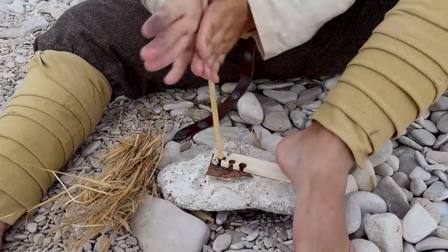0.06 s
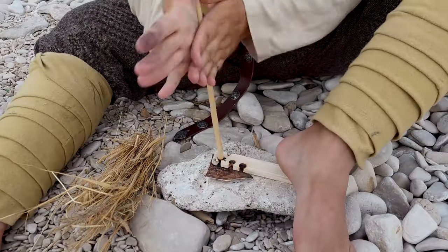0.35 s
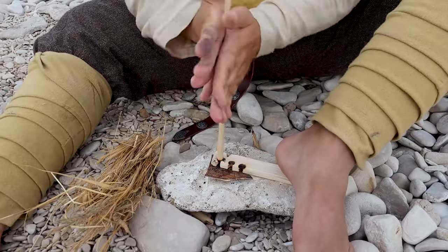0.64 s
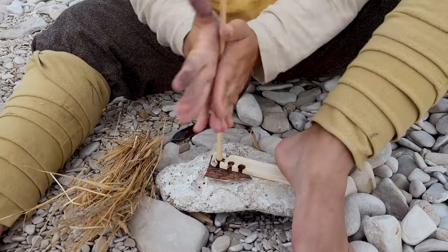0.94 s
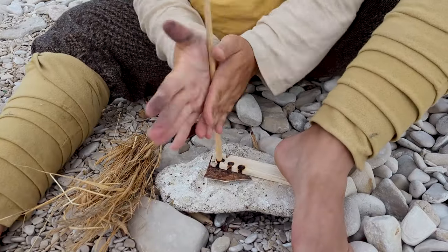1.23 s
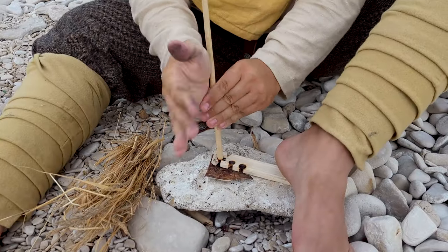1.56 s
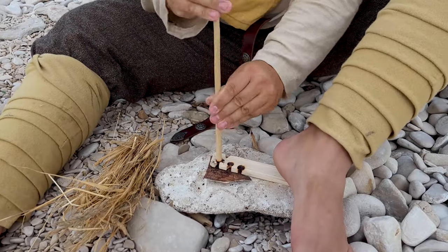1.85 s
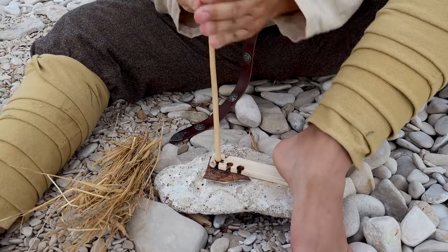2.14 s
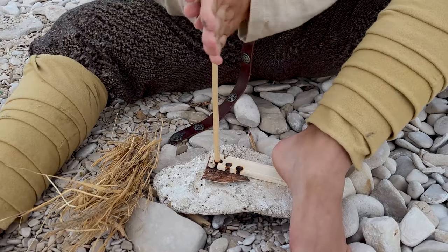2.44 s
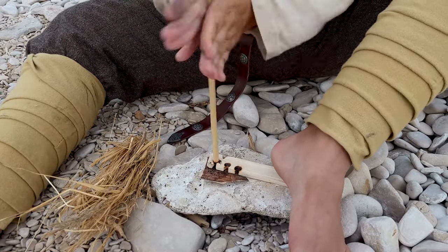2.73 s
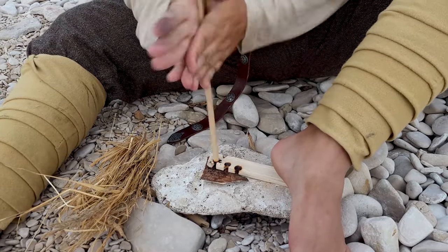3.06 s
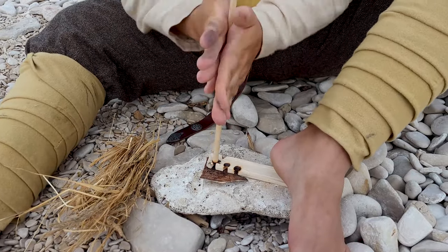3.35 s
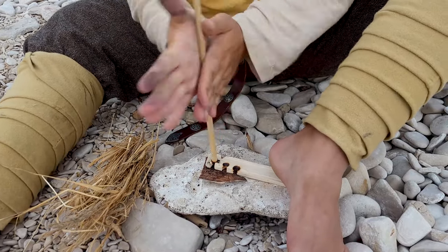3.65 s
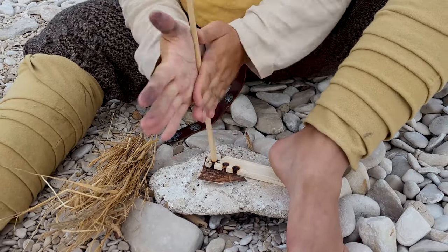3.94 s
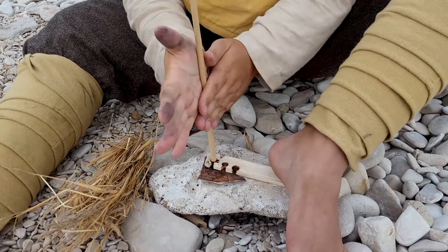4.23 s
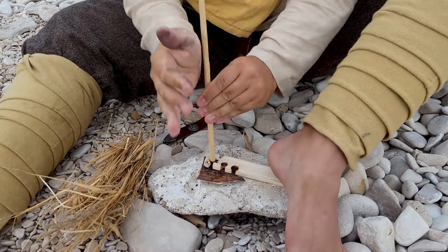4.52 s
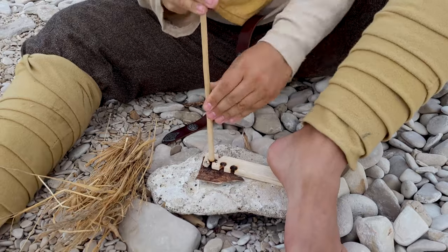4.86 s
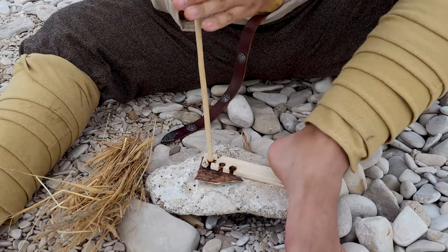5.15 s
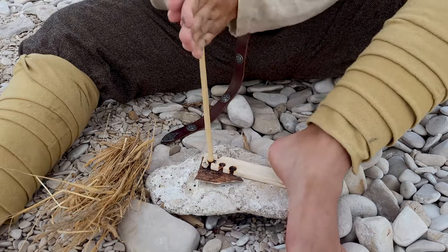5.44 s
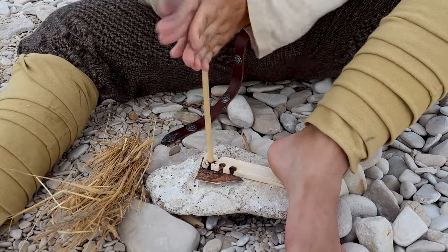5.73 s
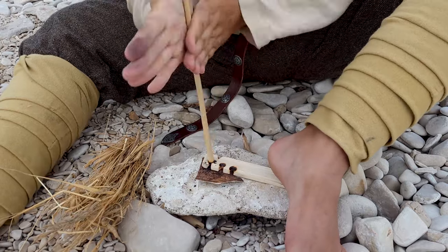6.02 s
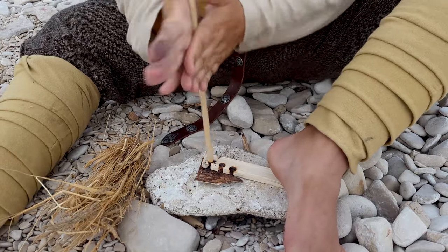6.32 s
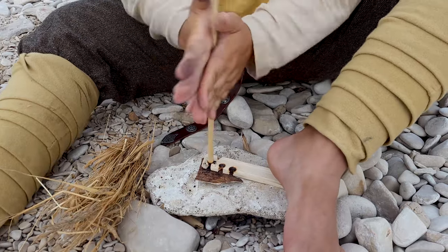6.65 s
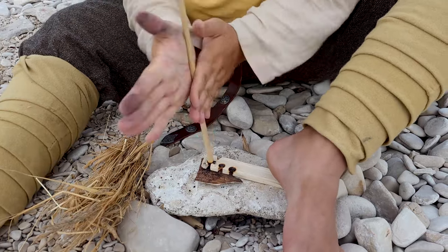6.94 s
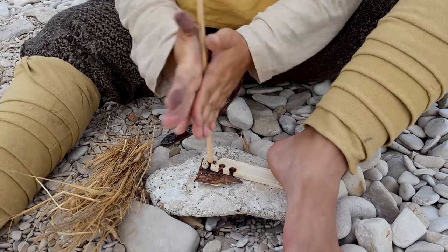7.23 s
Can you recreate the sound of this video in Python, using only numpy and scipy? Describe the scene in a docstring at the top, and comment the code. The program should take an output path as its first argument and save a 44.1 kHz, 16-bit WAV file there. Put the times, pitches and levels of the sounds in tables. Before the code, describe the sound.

A wooden spindle spun between the palms chirps shrilly and squeals against a fireboard, with a few knocks over faint surf.

```python
"""Shrill, paired chirps of a hand drill: a wooden spindle rolled between the palms in a charred socket.
At every reversal the tip sticks and slips, once braking and once restarting. Turned slowly while the
hands climb back up, it squeals and creaks. Brief squeaks, whistles and a few knocks on the fireboard
break in, over crackling char, a low grind and surf on a pebble beach.
Two microphone ports a hand apart hear it all from the left."""
import sys
import numpy as np
from scipy import signal
from scipy.fft import rfft, irfft, next_fast_len
from scipy.io import wavfile
from scipy.ndimage import uniform_filter1d, map_coordinates

SR = 44100
rng = np.random.default_rng(int(sys.argv[2]) if len(sys.argv) > 2 else 0)


def log_audio(samples):
    """Write samples as a 16-bit WAV file to the path given in sys.argv[1]."""
    # one column per channel
    frames = np.atleast_2d(samples).T
    # limit to full scale, then quantise
    limited = np.clip(frames, -1, 1)
    pcm = np.round(limited * 32767).astype(np.int16)
    wavfile.write(sys.argv[1], SR, pcm)


N = 325458

# The spindle's bright, broad tone colour. Each row: frequency in Hz, level in dB.
SPINDLE_SPECTRUM = [(2000, -43), (5500, -9), (6800, -6.5), (8000, -6), (9000, -1.5), (10300, -3),
                    (11200, -3), (12300, 2.5), (13500, 0.5), (15300, 12), (16500, -7.5)]
# Long squeals, one list each. Each row: time in seconds, pitch in Hz, relative levels of the high
# and of the low overtones in dB.
SQUEAL_PHRASES = [
    [(1.165, 1667, -37, -31.5), (1.187, 1674, -31.5, -44), (1.209, 1837, -33, -30),
     (1.255, 1835, -27, -29.5), (1.277, 1814, -38, -49), (1.329, 1817, -30, -40), (1.365, 1665, -37.5, -57),
     (1.377, 1533, -37, -42), (1.405, 1771, -34, -52), (1.455, 1825, -44, -40), (1.48, 1810, -62, -63)],
    [(1.62, 1899, -65, -67), (1.632, 1869, -46.5, -65), (1.648, 1831, -42.5, -52),
     (1.688, 1913, -42.5, -43.5), (1.698, 1765, -43, -54), (1.752, 1868, -40.5, -54.5),
     (1.834, 1664, -41.5, -55), (1.854, 1367, -39.5, -54), (1.908, 1605, -37.5, -46),
     (1.94, 1564, -41, -57), (1.95, 1541, -70, -76)],
    [(4.103, 1555, -54, -53), (4.107, 1566, -33, -40), (4.139, 1770, -32.5, -55), (4.169, 1832, -35, -32.5),
     (4.181, 1853, -33, -41), (4.283, 1804, -36.5, -54), (4.315, 1735, -39, -70), (4.341, 1767, -33.5, -43),
     (4.375, 1822, -45.5, -44.5), (4.439, 1774, -50, -62), (4.465, 1750, -74, -77)],
    [(4.53, 1710, -65, -64), (4.534, 1748, -53, -69), (4.542, 1910, -49.5, -92), (4.576, 1790, -43, -46),
     (4.584, 1833, -41, -52), (4.662, 1820, -40.5, -54), (4.714, 1747, -41, -51), (4.732, 1756, -41, -52),
     (4.74, 1680, -51, -66), (4.75, 1723, -78, -75)],
]
# Fader moves of the two beds. Each row: time in seconds, relative surf and grinding levels in dB.
BED_LEVELS = [(0.0, -51, -54), (0.2, -51, -52.5), (1.01, -58.5, -61), (1.35, -57.5, -61.5),
              (1.44, -56, -64.5), (1.99, -52.5, -57.5), (2.49, -47.5, -49), (3.35, -54.5, -55),
              (3.82, -54.5, -58), (4.36, -55, -60.5), (5.08, -54.5, -57), (5.41, -47.5, -49.5),
              (5.92, -47.5, -51), (6.27, -49, -48.5), (6.86, -54, -57.5), (7.38, -50, -61)]


def chirps(ring_hz=11320, bite_s=.003, skirt_db=-23, lead_s=.0011, tail_s=.026):
    """The tip bites and rasps; its pitch slides onto a spindle mode, holds there and slides off."""
    # Tone colour of the low rasp. Each row: frequency in Hz, level in dB.
    rasp_spectrum = [(900, -19), (1600, 5), (2400, 3), (3300, 3.5), (4200, -3), (5300, 8.5), (6300, -17.5),
                     (8000, -47)]
    t = np.arange(N) / SR
    high_gain, low_gain, ring_gain = np.zeros((3, N))
    pitch = np.full(N, float(ring_hz))
    for start, length, db, low_db, ring_share, glide in chirp_train():
        hz = ring_hz * (1 + .0087 * rng.standard_normal())
        near = slice(max(int((start - .05) * SR), 0), int((start + length + .19) * SR))
        age = t[near] - start
        progress = 2 * age / max(length, .002) - 1  # -1 at the start, 1 at the end
        grip = np.clip(age / bite_s + .5, 0, 1) * np.clip(1.15 - progress, 0, 1)
        fade = np.minimum(age / lead_s, 0) + np.minimum((length - age) / tail_s, 0)
        skirt = amp(skirt_db) * np.exp(fade)  # lighter rubbing before and after
        high_gain[near] += amp(db) * (grip * np.sqrt(1 - ring_share) + skirt)
        low_gain[near] += amp(db + low_db) * (grip + skirt)
        ring_gain[near] += amp(db) * grip * np.sqrt(ring_share)
        pitch[near] = np.where(grip > 0, hz * (1 + glide * np.clip(progress, -1, 1) ** 3), pitch[near])
    rasp = palm_damping(spread(slips(1900, scatter=.45, size_db=4, ring_s=.0013)), depth_db=6.5)
    phase = phase_of(pitch * (1 + .028 * wobble(1500)))
    sway = .7 * stereo_wobble(100)  # the swaying spindle changes its path to each port
    ring = unit(np.sin(phase + sway) * amp(.32 * wobble(400)))
    # half-regular slips give the rasp a woody pitch
    slip_phase = phase_of(1700 * (1 + .03 * wobble(120) + .075 * wobble(1500)))
    groan = unit(np.sin(2 * slip_phase) + np.sin(3 * slip_phase))
    woody = np.sqrt(.6) * wooden(rasp, rasp_spectrum) + np.sqrt(.4) * groan
    return high_gain * wooden(rasp, SPINDLE_SPECTRUM) + amp(-2.5) * low_gain * woody + ring_gain * ring


def chirp_train(pause_s=.013, light_db=-41, pressed_db=-10.5, brake_glide=-.15, rise_glide=.0567):
    """Cue the chirps: hand pressure shortens the standstill and coarsens the restart."""
    # The palms reverse. Each row: restart in seconds, pressure 0-1, braking length in seconds and
    # level in dB, restart length in seconds and level in dB, ringing share of the restart 0-1.
    reversals = [(0.038, .7, 0.016, -24.5, 0.013, -23.5, 0), (0.156, 0.34, 0.021, -24.5, 0.01, -19, 0.5),
                 (0.26, 0.75, 0.023, -23.5, 0.017, -24, 0), (.385, 0.17, 0.0094, -25.5, .012, -26, 0.77),
                 (0.493, 0.4, 0.015, -23.5, 0.019, -20, 0.82), (.614, 0.08, .005, -31, 0.01, -23.5, 0.71),
                 (0.719, 0.71, 0.024, -24, 0.026, -21, .45), (0.926, 0.85, .01, -24, 0.05, -24.5, 0.03),
                 (1.175, 0.66, 0.02, -26.5, .018, -30, .1), (2.601, 0, .012, -25.5, .01, -13, 0.72),
                 (2.713, 0.64, .023, -25, .032, -22, .65), (2.847, 0.18, 0.012, -25, .015, -17.5, 0.88),
                 (2.952, 0.74, 0.02, -23, 0.018, -23.5, 0.06), (3.075, 0, 0.0065, -23, 0.021, -23.5, 0.02),
                 (3.184, 0.45, 0.0093, -18.5, 0.013, -20.5, 0.24),
                 (3.402, 0.94, 0.0208, -22, 0.025, -24, 0.26), (3.622, 0.86, 0.016, -23, 0.031, -22, .3),
                 (3.848, 0.9, 0.019, -23, 0.043, -26.5, 0.3),
                 (5.606, 0.08, 0.0111, -27, 0.0175, -19.5, 0.68),
                 (5.724, 0.68, .026, -21.5, 0.022, -16, 0.83), (5.85, 0.03, 0.0094, -22, .016, -15.5, 0.91),
                 (5.957, 0.51, 0.014, -18.5, 0.02, -22.5, .2), (6.193, 0.82, .014, -18, .026, -25.5, 0.53),
                 (6.431, .85, 0.0094, -15, 0.022, -21.5, 0), (6.662, 0.63, 0.011, -18.5, 0.014, -22.5, .2),
                 (6.896, 0.57, .011, -21, .018, -19, 0.15), (7.121, 0.77, 0.012, -22, 0.019, -22, .4)]
    # The tip catches for an instant between chirps. Each row: start in seconds, level in dB.
    catches = [(0.223, -32), (.334, -35.5), (0.571, -39), (.839, -42), (1.052, -39), (1.072, -33.5),
               (2.671, -28), (2.813, -34), (3.149, -31), (3.288, -24.5), (3.509, -30.5), (3.733, -36.5),
               (6.066, -29), (6.089, -34), (6.158, -32), (6.222, -27), (6.309, -35.5), (6.553, -42),
               (7.092, -29), (7.326, -40)]
    # Each cue: start and length in seconds, level and relative low rasp in dB, ringing share,
    # glide as a share of the pitch.
    train = [(start, .00498, db, light_db, .08, rise_glide) for start, db in catches]
    for restart, pressure, brake_s, brake_db, restart_s, restart_db, ring_share in reversals:
        brake_at = restart - pause_s * (1 - .93 * pressure) - brake_s
        rasp_db = light_db + pressure * (pressed_db - light_db)
        train.append((brake_at, brake_s, brake_db, -24.5, .17, brake_glide))
        train.append((restart, restart_s, restart_db, rasp_db, ring_share, rise_glide))
    return train


def squeals():
    """Turned slowly, the tip slips steadily: a stack of overtones that frays when the grip is uneven."""
    # Tone colours of the squeal's high and low voices. Each row: frequency in Hz, level in dB.
    high_spectrum = [(5500, -13), (6600, -1.5), (7300, 4.5), (9100, -2), (10900, 8.5), (12700, -3.5),
                     (14600, 6), (16500, 1.5)]
    low_spectrum = [(1000, -10), (1750, -5), (3650, -0.5), (5450, 7.5), (6000, 5), (7000, -11)]
    gate, course_hz, high_db, low_db = phrases(SQUEAL_PHRASES)
    glide_hz = uniform_filter1d(course_hz, size=900)
    rough = roughness(glide_hz)
    waver = 1 + .003 * wobble(60) + .011 * rough * wobble(150) + (.003 + .013 * rough) * wobble(1600)
    pitch = glide_hz * waver
    phase = phase_of(pitch)
    stack = np.zeros((2, N))
    for k in range(1, 10):
        favour_db = 2.2 * wobble(22) + 1.5 * stereo_wobble(15)  # turning favours changing overtones
        flutter_db = (1 + 3.5 * rough) * wobble(300)
        drift = .55 * stereo_wobble(12) * min(k / 4, 1)
        stack += amp(favour_db + flutter_db) * np.sin(k * phase + drift)
    scrape = palm_damping(spread(slips(pitch, scatter=.38, size_db=5.5, ring_s=.00025)), depth_db=9)

    def voice(spectrum, fray):
        return np.sqrt(1 - fray) * coloured(stack, spectrum) + np.sqrt(fray) * coloured(scrape, spectrum)

    high = amp(high_db + 6) * voice(high_spectrum, rough ** 1.5)
    low = amp(low_db + 1.5) * voice(low_spectrum, rough ** 2)
    return gate * (high + low)


def roughness(pitch, clean_hz=1820, break_sag_hz=350):
    """A squeal bites roughly and settles; it frays again whenever its pitch sags."""
    # The grip in each squeal. Each row: settling time in seconds, roughness that stays 0-1.
    grips = [(.04, .18), (.12, .24), (.055, .08), (.06, .05)]
    settling = []
    for rows, (settle_s, rest) in zip(SQUEAL_PHRASES, grips):
        start, end = rows[0][0], rows[-1][0]
        settling += [(start, .85), (start + settle_s, rest), (end, rest)]
    sag = np.maximum(clean_hz - pitch, 0) / break_sag_hz
    return np.clip(curves(settling)[0] + sag ** 2, 0, 1)


def creaks():
    """As the palms take a new hold, the slips slow down into a grainy creak."""
    # One list per creak. Each row: time in seconds, relative levels of bright edge and body in dB.
    creak_phrases = [
        [(1.96, -79, -79), (1.98, -45, -70), (2.002, -63, -76), (2.01, -44.5, -56), (2.046, -42, -54),
         (2.076, -75, -75), (2.104, -46, -54), (2.27, -60, -52)],
        [(2.275, -47, -55), (2.317, -25, -48), (2.329, -31, -51), (2.343, -27.5, -41), (2.421, -35.5, -54),
         (2.429, -34, -34), (2.459, -29.5, -43), (2.485, -43, -44)],
        [(4.88, -77, -79), (4.894, -76, -79), (4.898, -63, -68), (4.904, -56, -64), (4.986, -53.5, -62),
         (5.002, -58, -62), (5.01, -76, -78), (5.02, -77, -79)],
        [(5.22, -77, -66), (5.236, -62, -41.5), (5.302, -82, -74), (5.346, -38.5, -42.5), (5.394, -46, -60),
         (5.424, -28.5, -34), (5.454, -32.5, -35), (5.5, -60, -63)],
    ]
    # Pace of the slips, which nearly stall once. Each row: time in seconds, slips per second.
    slip_rates = [(2.04, 550), (2.1, 390), (2.355, 510), (2.42, 140), (2.45, 900), (4.89, 640)]
    # The creak's woody body. Each row: frequency in Hz, level in dB.
    body_spectrum = [(1200, -22), (2200, -0.5), (2800, 2), (3500, -0.5), (4400, -7.5), (5300, -7.5),
                     (7500, -5)]
    gate, edge_db, body_db = phrases(creak_phrases)
    rate = curves(slip_rates)[0] * np.exp(.12 * wobble(25))
    ticks = spread(slips(rate, scatter=.12, size_db=2, ring_s=.0007))
    ticks *= np.sqrt(np.mean(rate) / rate)  # sparser slips hit harder
    ticks = palm_damping(ticks, depth_db=2.5)
    edge = amp(edge_db + 4) * wooden(ticks, SPINDLE_SPECTRUM)
    body = amp(body_db - 2) * wooden(ticks, body_spectrum)
    return gate * (edge + body)


def squeaks(rise=.0344, third_db=5):
    """A hard-pressed stroke ends in a brief squeak that bends upward."""
    # Each row: start and length in seconds, level in dB, centre pitch in Hz, relative overtones in dB.
    cues = [(.038, .02, -35, 980, -22), (.26, 0.0086, -35.5, 1046, -11), (.716, 0.0076, -42, 1448, 12.5),
            (0.936, 0.04, -44, 1710, -21), (1.905, 0.033, -44.5, 307.8, -8), (2.951, 0.015, -36, 1106, -30),
            (3.182, .0074, -33.5, 3580, -9), (3.624, 0.028, -41, 1630, -12),
            (3.845, 0.0464, -32.5, 1805, -1.5), (4.802, 0.0098, -55.5, 3190, 11),
            (4.842, 0.021, -62.5, 3340, 19.5), (5.957, .012, -32.5, 993, -14),
            (6.659, 0.013, -40.5, 1494, 9), (6.89, .029, -35, 1662, 3.5), (7.118, 0.0323, -36.5, 1830, -1)]
    out, waver = np.zeros(N), 1 + .022 * wobble(1200)
    for start, length, db, hz, overtone_db in cues:
        start_hz, end_hz = hz * (1 - rise), hz * (1 + rise)
        n, at = int(length * SR), int(start * SR)
        phase = phase_of(np.linspace(start_hz, end_hz, n) * waver[at:at + n])
        overtones = sum(amp(third_db * (k == 3)) * np.sin(k * phase)
                        for k in range(2, 6) if k * end_hz < SR / 2)
        tone = unit(np.sin(phase)) + amp(overtone_db) * unit(overtones)
        out[at:at + n] += amp(db) * signal.windows.tukey(n, .5) * tone
    return out


def whistles(left_lead_db=6):
    """One spindle mode takes over the friction and sings with its octave."""
    # Each row: start and length in seconds, level in dB, first and last pitch in Hz,
    # octave against the fundamental in dB.
    cues = [(2.316, .03, -23.5, 7220, 7220, -6), (2.578, 0.01, -25.5, 6880, 6360, -15),
            (5.363, .022, -29.5, 7040, 7360, -7), (5.385, 0.049, -22.5, 7220, 7380, 0.5),
            (5.584, 0.01, -24, 4650, 4450, -13.5)]
    out, waver = np.zeros(N), 1 + .0055 * wobble(1200)
    for start, length, db, start_hz, end_hz, octave_db in cues:
        n, at = int(length * SR), int(start * SR)
        phase = phase_of(np.linspace(start_hz, end_hz, n) * waver[at:at + n])
        tone = unit(np.sin(phase) + amp(octave_db) * np.sin(2 * phase))
        out[at:at + n] += amp(db) * signal.windows.tukey(n, .5) * tone
    return out * amp(left_lead_db * np.array([[.5], [-.5]]))


def knocks():
    """The spindle knocks in its socket: dull blows on a board that foot and stone damp at once."""
    # Each row: start in seconds, level in dB.
    blows = [(0.9224, -15.5), (1.1532, -17), (1.722, -26.5), (4.0892, -22), (7.3191, -18.5)]
    # Fireboard modes. Each row: frequency in Hz, level in dB, seconds to die away by 60 dB.
    board_modes = [(277, -16.5, 0.062), (608, -4, 0.025), (1070, 4.5, 0.0097), (1400, 1.5, 0.0057)]
    out, t = np.zeros(N + SR), np.arange(SR // 10) / SR
    for start, db in blows:
        ring = sum(amp(level + rng.normal(0, 1) - 60 * t / t60) * np.sin(2 * np.pi * hz * t) * (-1) ** k
                   for k, (hz, level, t60) in enumerate(board_modes))
        out[round(start * SR):][:len(t)] += amp(db) * ring / np.max(abs(ring))
    return out[:N]


def dust(level_db):
    """Fine crackle of char between the chirps."""
    # The char's hissy tone colour. Each row: frequency in Hz, level in dB.
    spectrum = [(2000, -58), (4000, 4), (7500, -2.5), (9000, 0), (11000, 9), (13000, 2), (15500, 9.5)]
    grains = palm_damping(spread(slips(2500, scatter=.5, size_db=3, ring_s=.0012)), depth_db=1.5)
    return amp(level_db + 3.9 * wobble(33)) * coloured(grains, spectrum)


def passes(idle_db=-60.5, fade_s=.086):
    """Dust level and friction treble, in dB, drift as the palms work their way down the spindle."""
    # Each row: start and end in seconds, first and last dust level in dB, first and last treble in dB.
    descents = [(0, 1.4, -43.5, -56, 2.5, 0), (2.32, 4.056, -40, -54.5, 0.5, 3),
                (5.35, 7.45, -47.5, -45, 1, -6)]
    rows = []
    for start, end, dust_from, dust_to, treble_from, treble_to in descents:
        rows += [(start - fade_s, idle_db, treble_from), (start, dust_from, treble_from),
                 (end, dust_to, treble_to), (end + fade_s, idle_db, treble_to)]
    return curves(rows)


def grinding():
    """The running spindle grinds in its socket: dense slips blur into a quiet bed."""
    # The grind's midrange colour. Each row: frequency in Hz, level in dB.
    spectrum = [(300, -23), (900, -6.5), (1400, 1), (2000, 2.5), (2600, -13), (4000, -15), (7000, -9),
                (16000, -30)]
    _, level_db = curves(BED_LEVELS)
    grains = palm_damping(spread(slips(2500, scatter=.34, size_db=0, ring_s=.0029)), depth_db=4)
    return amp(level_db + 1 + .58 * wobble(16)) * coloured(grains, spectrum)


def surf():
    """Surf washes behind the drill as dark, swelling noise."""
    # Tone colour of the wash. Each row: frequency in Hz, level in dB.
    spectrum = [(20, -20), (48, -4), (90, -3), (150, -1), (260, 5.5), (400, 1), (600, -0.5), (900, 0),
                (1400, -11), (3000, -11), (16000, -40)]
    level_db, _ = curves(BED_LEVELS)
    return amp(level_db + 3.5 + wobble(10)) * coloured(spread(rng.standard_normal((2, N))), spectrum)


def slips(rate, scatter, size_db, ring_s):
    """Uneven slips, about rate a second; each shakes the wood into a noise burst, in two channels."""
    count = np.floor(np.cumsum(rate * np.exp(scatter * wobble(700))) / SR)
    kicks = np.diff(count, prepend=0) * amp(size_db * rng.standard_normal(N))
    shake = signal.lfilter([1], [1, -np.exp(-1 / (ring_s * SR))], kicks)
    return shake * rng.standard_normal((2, N))


def wooden(x, spectrum):
    """Play x through a broad spectrum and the spindle's resonances, at rms 1."""
    # The spindle's peaks and notches. Each row: centre and width in Hz, boost or cut in dB.
    resonances = [(3650, 1600, 10.5), (4500, 440, 1), (5700, 110, 0), (7550, 1080, 8), (7570, 540, 5.5),
                  (9500, 380, 3.5), (8880, 120, -2), (10905, 425, 17), (11930, 320, -13), (17000, 360, -11)]
    peaks = lambda hz: 1 + sum((amp(db) - 1) / (1 + (2 * (hz - centre) / width) ** 2)
                               for centre, width, db in resonances)
    return unit(filtered(x, lambda hz: amp(along(spectrum, hz)) * peaks(hz)))


def palm_damping(x, depth_db):
    """The moving palms damp the wood in ever different narrow bands."""
    bands = signal.stft(x, nperseg=512)[2]
    field = uniform_filter1d(rng.standard_normal(bands.shape), size=3, axis=1)  # across frequency
    field = uniform_filter1d(field, size=4, axis=2)  # across time
    return unit(signal.istft(bands * amp(depth_db * unit(field)), nperseg=512)[1][:, :N])


def spread(pair):
    """Mix two unrelated signals to a partly alike left and right."""
    # Stereo image. Each row: frequency in Hz, left-right likeness 0-1.
    likeness = [(50, 0.74), (200, 0.98), (1000, 0.86), (2000, 0.93), (3000, 0.057), (16000, 0.82)]
    angle = lambda hz: np.arccos(np.clip(along(likeness, hz), -1, 1)) / 2
    mid, side = filtered(pair, lambda hz: np.array([np.cos(angle(hz)), np.sin(angle(hz))]))
    return np.array([mid + side, mid - side])


def microphone_ports(x):
    """Sound reaches the left port first and bends round the housing, which shades each port's bands."""
    # The housing's shade. Each row: frequency in Hz, left minus right in dB.
    balance = [(1000, 1), (1600, -4), (2200, 0.5), (3200, 9), (5000, 7), (6500, -2), (7300, -0.5),
               (9000, 5.5), (10600, -7), (11400, 2), (12800, 3.5), (15800, -4.5)]
    # The way round the housing. Each row: frequency in Hz, lag of the right port in milliseconds.
    lag = [(250, 0.43), (600, 0.4), (1000, 0.46), (1750, 0.54), (3600, 0.575), (5500, 0.566),
           (7200, 0.4545), (9100, 0.539), (10000, 0.5283), (11200, 0.4974), (12500, 0.4675), (15500, 0.424)]
    side = np.array([[.5], [-.5]])

    def response(hz):
        shade = amp(side * along(balance, hz))
        delay = np.exp(2j * np.pi * hz * side * along(lag, hz) / 1000)
        return shade / np.sqrt(np.mean(shade ** 2, axis=0)) * delay

    return filtered(x, response)


def amp(db):
    """Decibels to gain."""
    return 10 ** (np.asarray(db) / 20)


def unit(x):
    """x at rms 1."""
    return x / np.sqrt(np.mean(x ** 2) + 1e-20)


def phase_of(hz):
    """Running phase of a pitch curve, in radians."""
    return 2 * np.pi * np.cumsum(hz) / SR


def along(points, hz):
    """Read (Hz, value) points along a log frequency axis."""
    freqs, values = np.transpose(points)
    return np.interp(np.log(hz + 1), np.log(freqs + 1), values)


def curves(rows):
    """One automation curve for each column after the time."""
    times, *columns = np.transpose(rows)
    return [np.interp(np.arange(N) / SR, times, column) for column in columns]


def phrases(tables, fade_s=.0046):
    """A gate that is open during each phrase, then the curves through all the phrases."""
    t = np.arange(N) / SR
    gate = sum(np.clip(np.minimum(t - rows[0][0], rows[-1][0] - t) / fade_s, 0, 1) for rows in tables)
    return [gate] + curves([row for rows in tables for row in rows])


def wobble(rate):
    """A smooth random curve, rate knots a second."""
    knots = rng.standard_normal(N // 4)
    return map_coordinates(knots[:int(N * rate / SR) + 4], [np.arange(N) * rate / SR], mode="mirror")


def stereo_wobble(rate):
    """A separate wobble for left and right."""
    return np.array([wobble(rate), wobble(rate)])


def filtered(x, response):
    """x through a complex frequency response."""
    size = next_fast_len(N + 8192)
    return irfft(rfft(x, size) * response(np.fft.rfftfreq(size, 1 / SR)), size)[..., :N]


def coloured(x, spectrum):
    """x through a spectrum, at rms 1."""
    return unit(filtered(x, lambda hz: amp(along(spectrum, hz))))


def scene():
    """Mix the drill over the surf; the friction's treble drifts with each pass of the hands."""
    dust_db, treble_db = passes()
    friction = chirps() + creaks() + dust(dust_db)
    treble = filtered(friction, lambda hz: np.clip((hz - 8500) / 5000, 0, 1))
    friction += (amp(treble_db) - 1) * treble
    return microphone_ports(friction + squeals() + squeaks() + whistles() + knocks() + surf() + grinding())


def record(dry):
    """Cut everything above 16 kHz."""
    return filtered(dry, lambda hz: hz < 16000)


dry = scene()
out = record(dry)
log_audio(out)
```